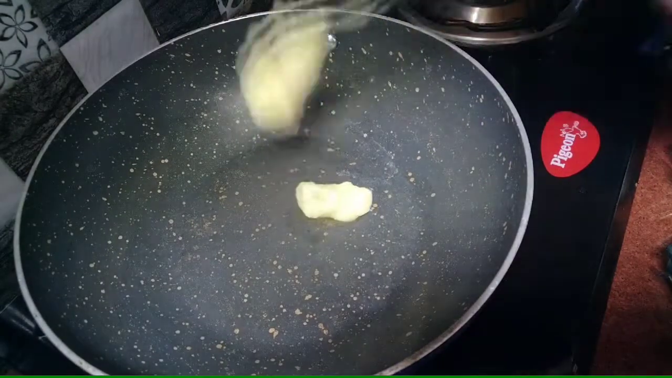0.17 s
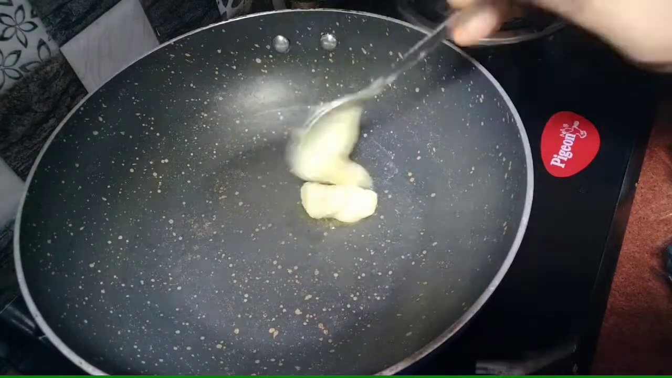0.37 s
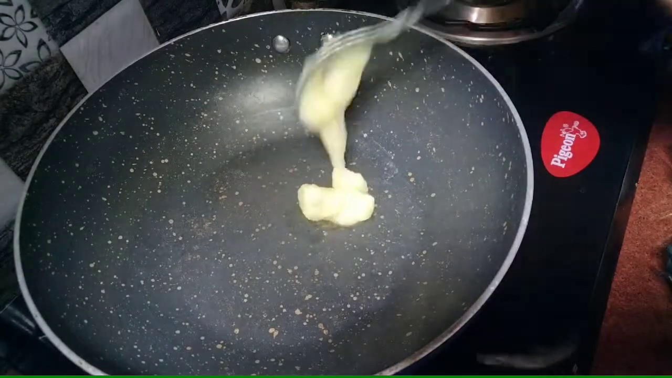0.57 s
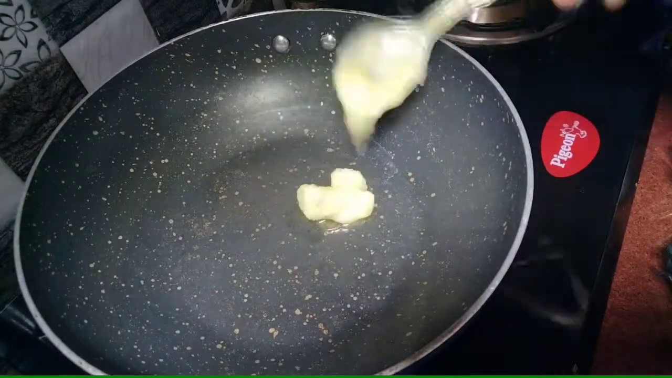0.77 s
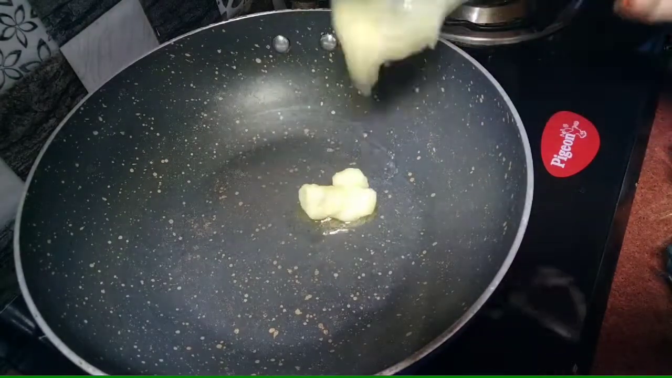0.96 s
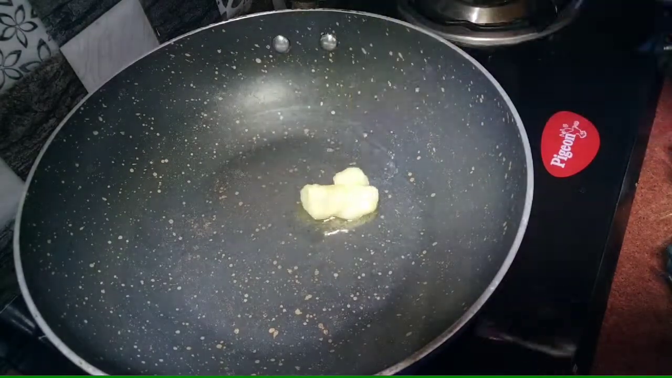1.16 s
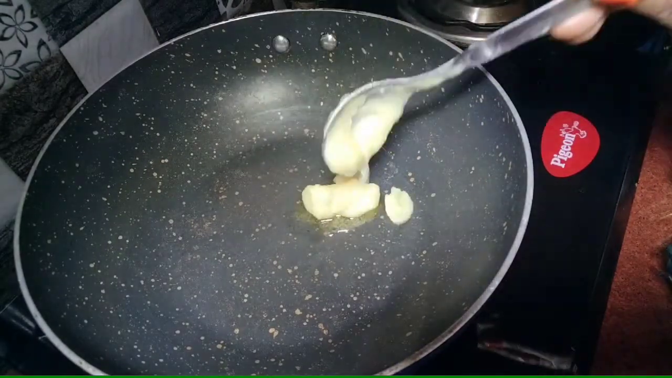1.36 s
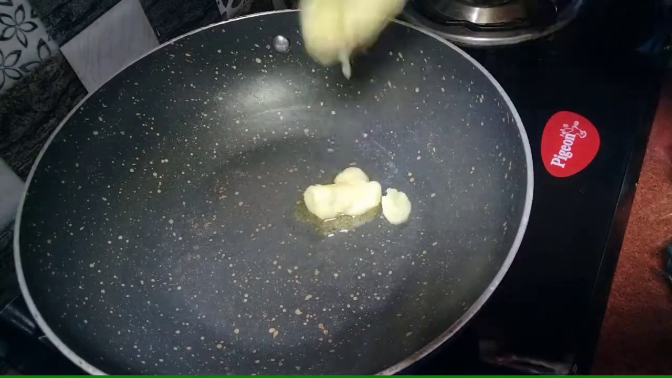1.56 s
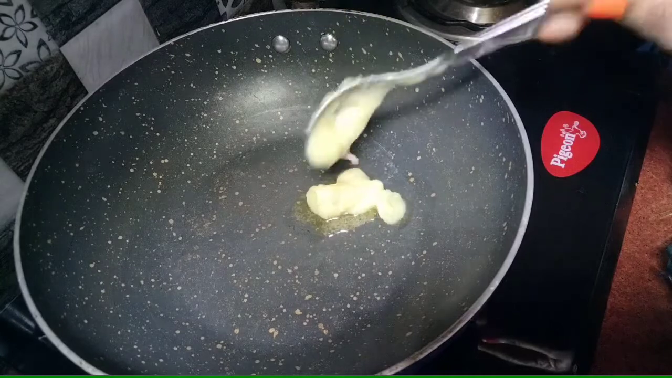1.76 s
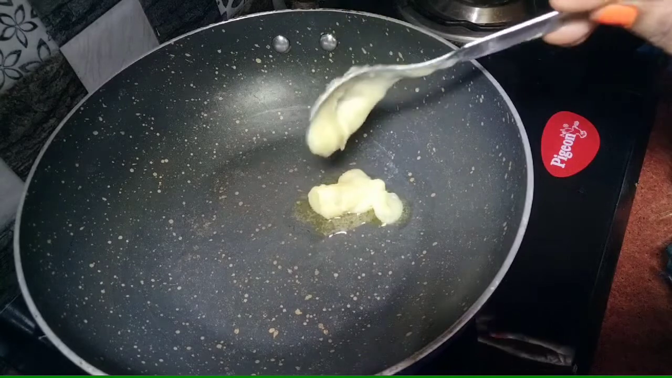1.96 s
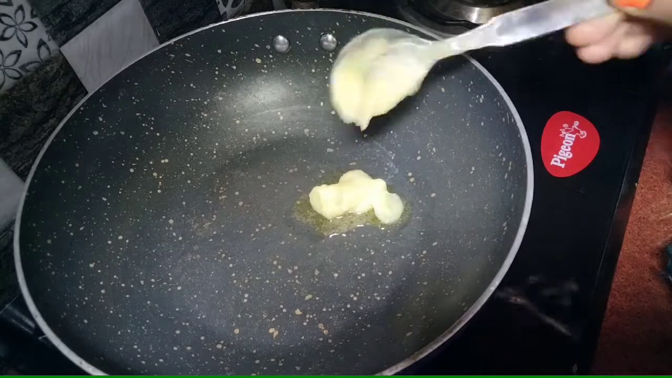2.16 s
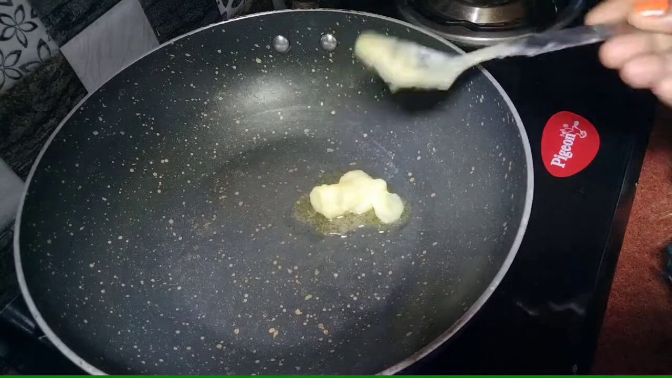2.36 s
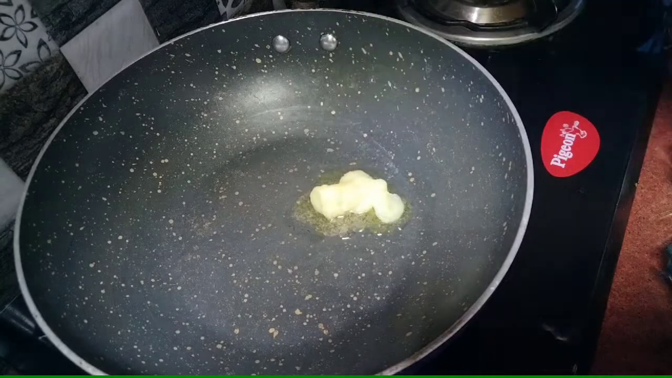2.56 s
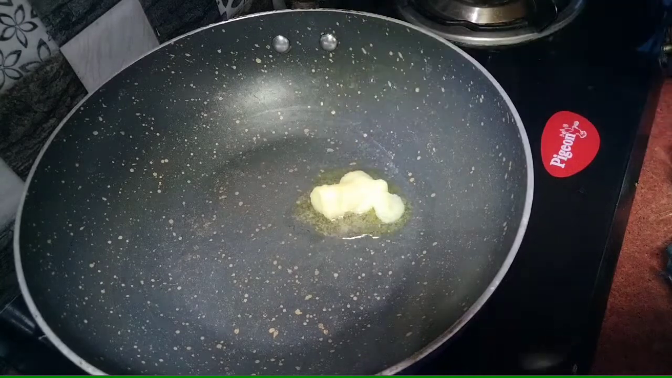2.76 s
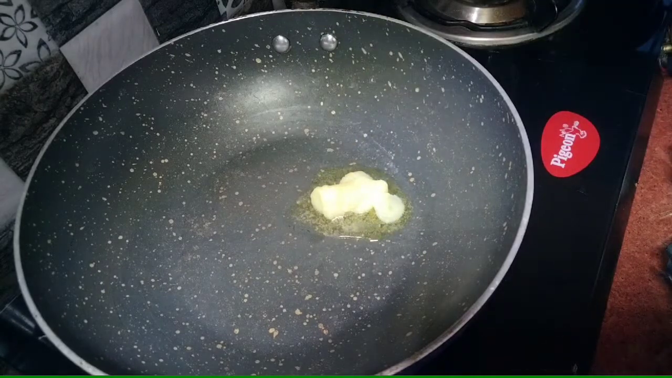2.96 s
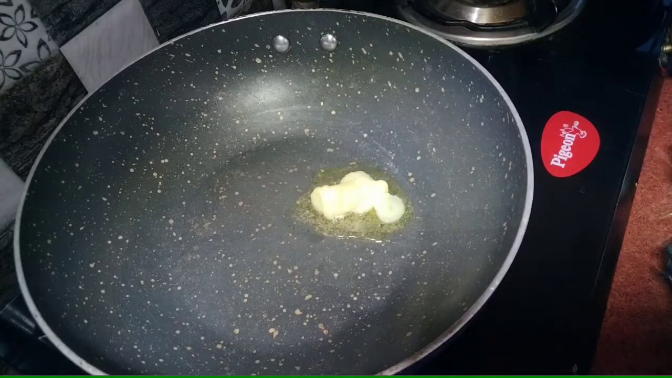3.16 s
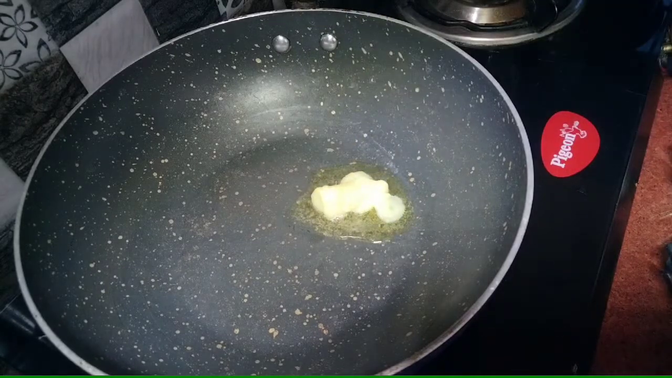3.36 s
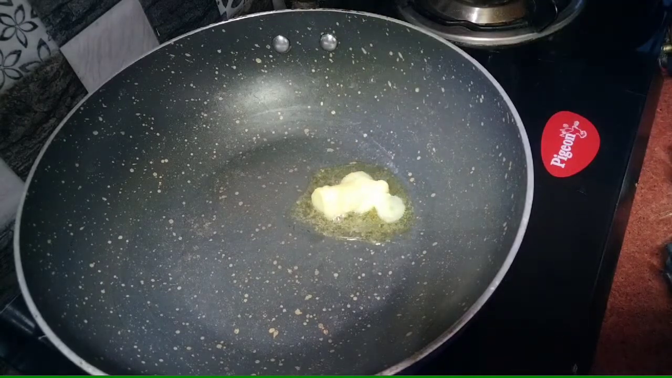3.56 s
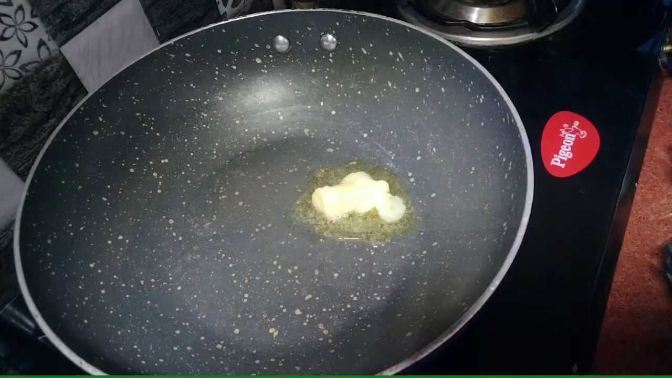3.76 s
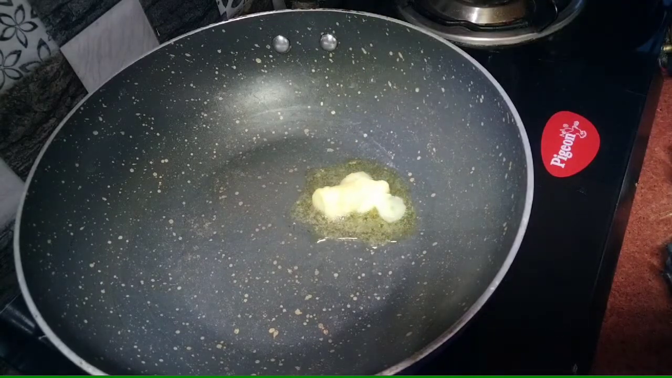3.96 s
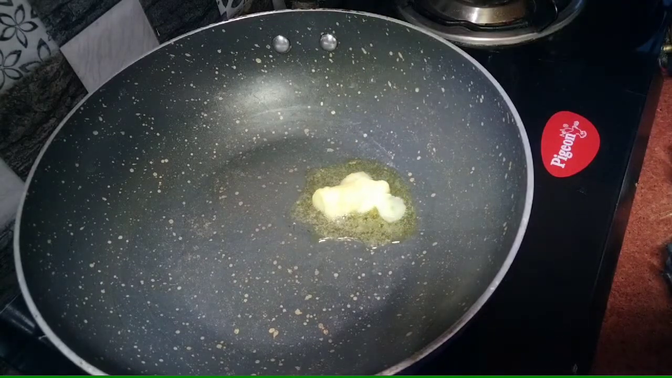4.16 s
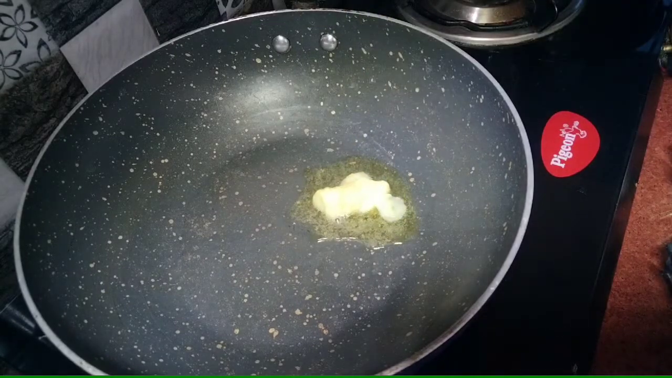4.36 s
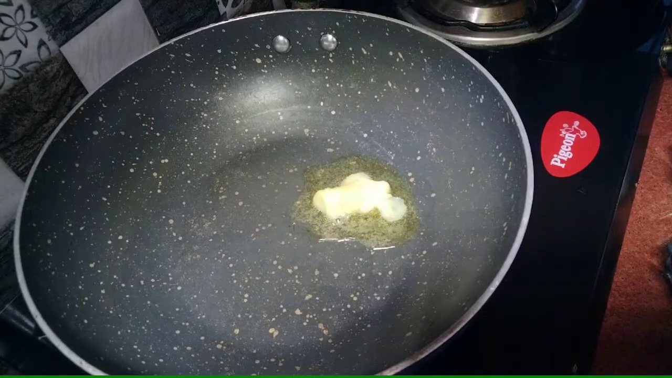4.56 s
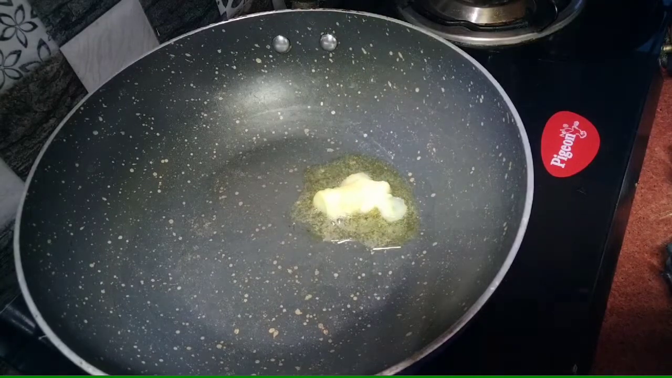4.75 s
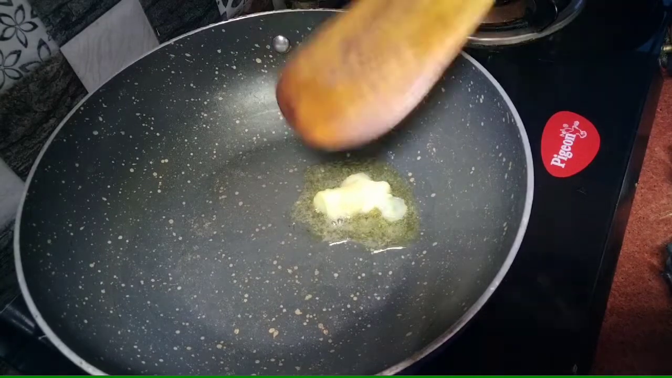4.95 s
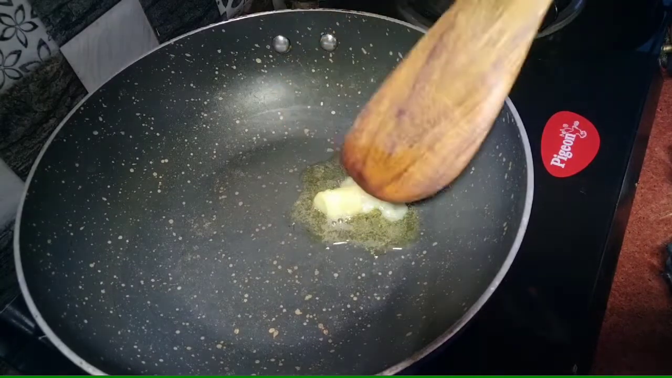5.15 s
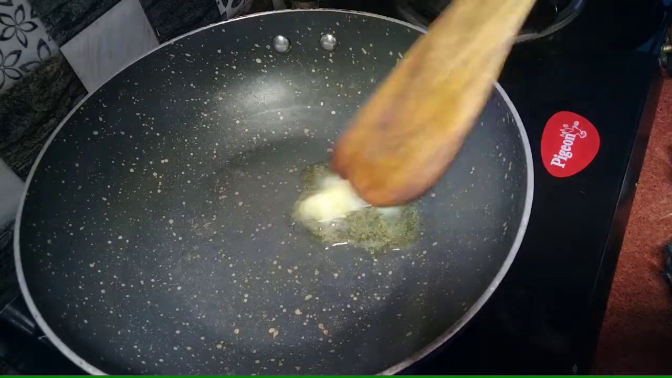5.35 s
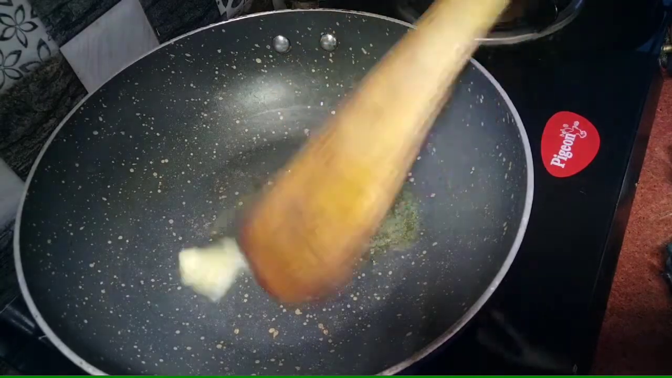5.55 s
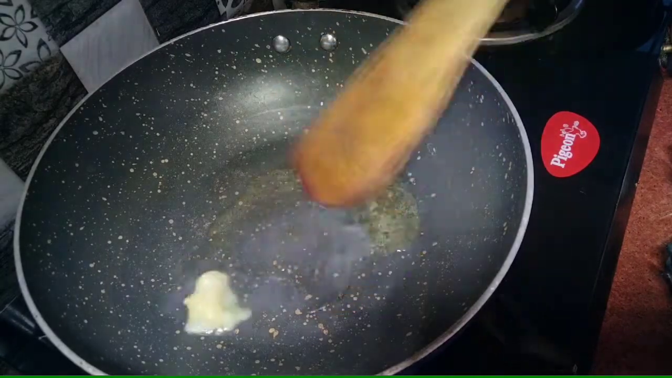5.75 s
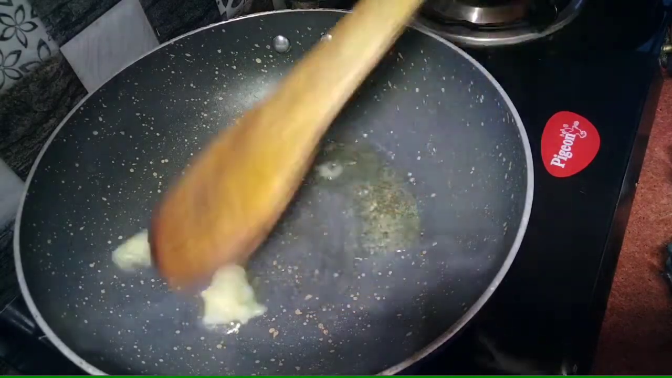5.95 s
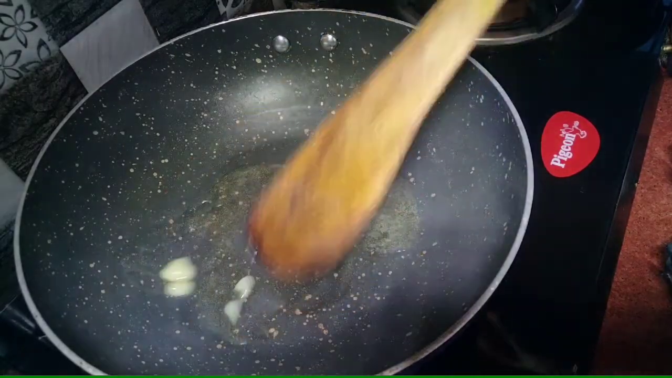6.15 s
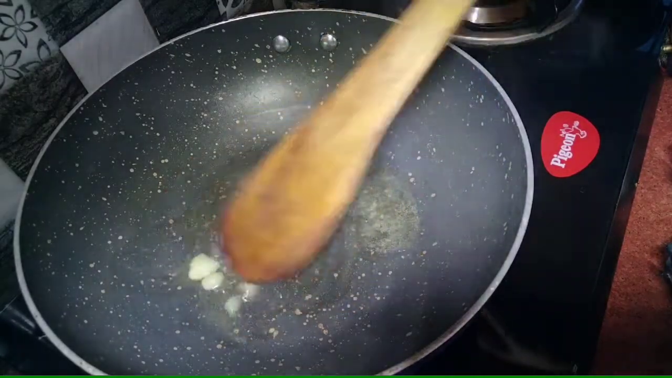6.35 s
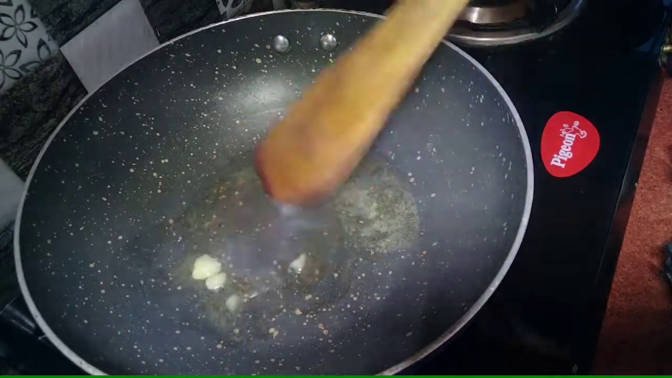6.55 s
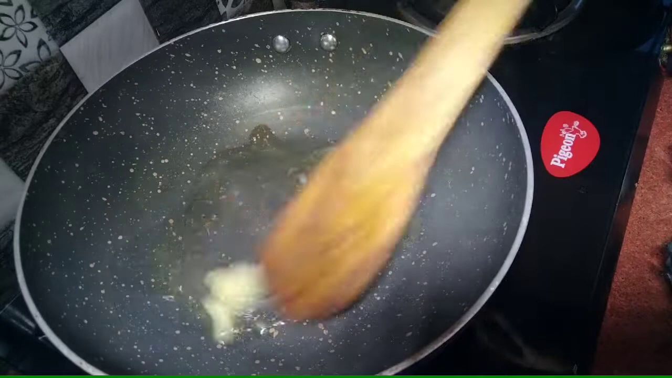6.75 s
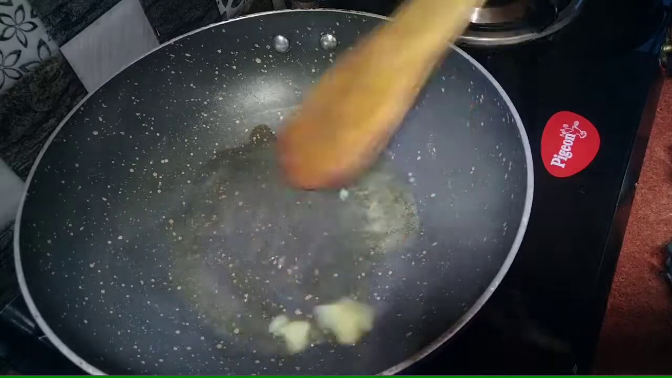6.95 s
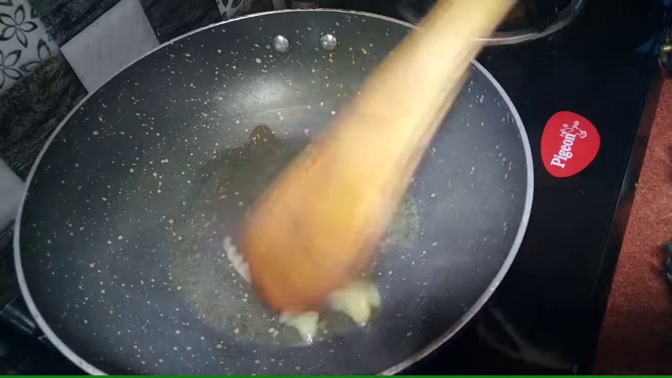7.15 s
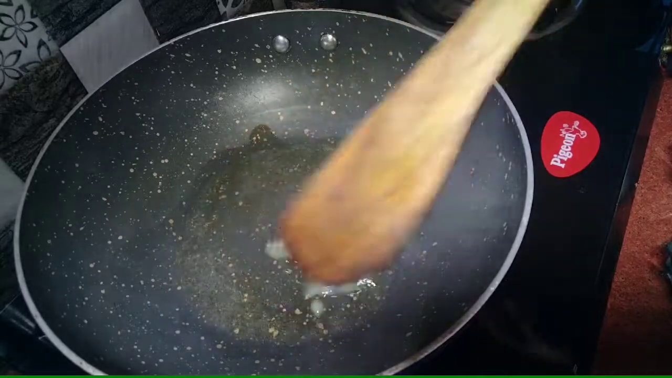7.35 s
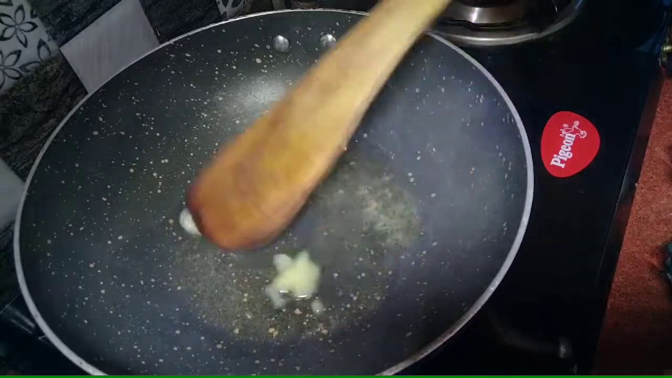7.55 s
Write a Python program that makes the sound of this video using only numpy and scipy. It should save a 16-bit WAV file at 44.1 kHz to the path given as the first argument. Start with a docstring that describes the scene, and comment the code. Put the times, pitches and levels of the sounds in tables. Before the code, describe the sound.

Melting fat ticks and pops quietly with small metallic clinks, until a wooden spatula smears it and the crackle surges into dense frying sizzle.

```python
"""Ghee melting in a hot pan

Water boils out of a lump of ghee in small bursting bubbles, made of short cracks and ringing cavities.
Lone louder spits stand out, and a spoon clinks and rubs off to the side as a set of ringing metal tones.
Then a wooden spatula clicks down and, in tiny random slips, smears the fat: the crackle swells to a sizzle.
Behind it lie the filtered-noise rumble of a small kitchen, a low hum and faint far tones."""
import sys
import numpy as np
from scipy import signal
from scipy.fft import rfft, irfft
from scipy.io import wavfile
from scipy.ndimage import uniform_filter1d

SR = 44100
rng = np.random.default_rng(int(sys.argv[2]) if len(sys.argv) > 2 else 0)


def unload_audio(sound):
    """Save the sound as a 16-bit wav file, at the path given as the first command line argument."""
    columns = np.transpose(np.atleast_2d(sound))
    # keep every value between -1 and 1, then stretch to whole-number steps
    steps = np.round(np.clip(columns, -1, 1) * 32767)
    wavfile.write(sys.argv[1], SR, steps.astype(np.int16))


N = 335157
T = np.arange(N) / SR  # time of each sample, in seconds
TOP_HZ = 15800  # upper limit of the sound

# tone balance of the melting fat: pitch_hz, level_db (relative)
MELT_COLOUR = [(200, -44), (700, -18), (1300, -18), (2400, -16.8), (4000, -11), (5200, -9), (6500, -10),
               (8100, -4.5), (8950, 0), (9500, -4.5), (10100, -5), (10900, -13), (13000, -13.5),
               (16000, -18.5)]
# moments when water seeps out and boils harder: start_s, length_s (until it fades), level_db
SURGES = [(-.02, 0.047, -47), (.73, 0.029, -50), (1.07, .18, -49), (1.48, 0.037, -47.5), (2.3, .12, -54),
          (3.26, 0.13, -48), (3.76, .04, -45), (3.88, 0.061, -49), (4.2, 0.21, -48), (4.8, 0.12, -49),
          (5.06, 0.42, -45.5)]
# the crackle grows as the pool of fat spreads: first and full level, time constant
MELT_FIRST_DB, MELT_FULL_DB, POOL_S = -52.5, -48, 0.89
# small bubbles that flare after each spit or tick: level against its listed level, decay time
FLURRY_DB, FLURRY_S = -23.5, 0.039


def melting():
    """Sparse crackle over a fine fizz: it grows with the pool, surges, and flares after each spit or tick."""
    growth_db = MELT_FULL_DB + (MELT_FIRST_DB - MELT_FULL_DB) * np.exp(-T / POOL_S)
    pool = undb(growth_db + 0.8 * walk(30.05))
    surges = swells(SURGES, attack_s=0.007, release_s=0.039)
    flurry_rows = [(start_s, 0, level_db + FLURRY_DB) for start_s, level_db, *_ in SPITS_AND_TICKS]
    flurries = swells(flurry_rows, attack_s=0.0022, release_s=FLURRY_S)
    flurries = flurries * (1 - covered())  # gone once the fat is smeared out
    crackle = boil(rate=700, spread_db=6.0, limit_db=13.0, tear_s=0.0012, ring_db=-6,
                   cycles=27.6, cavity_hz=7543, bunch_db=2.1)
    fizz = undb(-3.5) * rng.standard_normal(N)
    loudness = np.sqrt(pool ** 2 + surges ** 2 + flurries ** 2)
    return unit(colour(crackle + fizz, MELT_COLOUR)) * loudness


# single loud bubbles, and two ticks made the same way: at 3.410 s the bright tick of the spoon's clink,
# at 5.341 s the click of the spatula touching down. Columns: start_s,
# level_db (about the peak, before pan and kitchen), ring_hz (for a bubble, its cavity),
# ring_db (ring, relative), snap_db (low snap, relative)
SPITS_AND_TICKS = [(0.110, -30.5, 10460, 7, -23), (0.333, -30, 5510, -9, -21), (0.371, -28, 13400, -1, -36),
                   (0.426, -27, 7260, -1, -28), (0.499, -28, 8800, -5, -27), (0.758, -30.5, 12000, 6, -31),
                   (0.943, -28, 11020, 4, -25), (1.111, -32, 6750, 0, -28), (1.180, -27.5, 7410, -2, -25),
                   (1.326, -28, 9070, -1, -23), (1.694, -28, 7580, 4, -29), (1.821, -29.5, 8720, -3, -22),
                   (1.834, -26, 6760, -3, -13), (1.900, -27, 8900, -3, -26), (2.166, -24.5, 8950, -7, -14),
                   (2.573, -24, 9100, -13, -11), (2.796, -26.5, 8940, 2, -22),
                   (3.347, -24.5, 8740, -6, -13), (3.410, -21.5, 9650, -5, -20),
                   (3.490, -30, 8860, -6, -22), (3.572, -24, 8660, -3, -18), (3.835, -23.5, 8250, -2, -29),
                   (3.970, -27.5, 9400, -1, -22), (4.069, -26.5, 7440, -2, -15),
                   (4.165, -22.5, 7030, -5, -17), (4.260, -29, 8800, -1, -23), (4.374, -26, 8530, -5, -32),
                   (4.563, -26.5, 8600, -4, -21), (4.648, -30.5, 7750, 3, -33), (4.795, -27, 7360, 4, -26),
                   (5.035, -26, 5030, 0, -19), (5.162, -33, 6840, 5, -25), (5.341, -20.5, 9000, -2, -15),
                   (6.306, -17, 10250, -4, -24), (6.528, -18.5, 8000, 0, -35),
                   (6.818, -14.5, 8440, -21, -29), (6.867, -9.8, 8380, -1, -33),
                   (7.015, -17.5, 8300, -1, -21)]


def spits_and_ticks():
    """Lone bubbles burst as dry snaps or ringing pips; the spoon's tick and spatula's click work alike."""
    out = np.zeros(N)
    for start_s, level_db, ring_hz, ring_db, snap_db in SPITS_AND_TICKS:
        burst = bubbles(np.array([ring_hz]), np.array([0.0012]), ring_db=ring_db, cycles=16, size=500)[0]
        pop = colour(burst, MELT_COLOUR)
        snap = resonate(burst, [(2470, 5400, 0)])  # a broad low resonance
        pop = pop / np.abs(pop).max()
        snap = undb(snap_db) * snap / np.abs(snap).max()
        add(out, start_s, undb(level_db) * (pop + snap) / (1 + undb(snap_db)))
    return out


# pushes of the spatula: start_s, length_s (until it fades), scrape_db, extra_sizzle_db
STROKES = [(5.186, .04, -53.5, -60), (5.546, 0.065, -52, -40), (5.853, .08, -58, -37.5),
           (5.93, .04, -47.5, -46), (6.08, .11, -55, -40), (6.31, .05, -55, -41), (6.458, 0.12, -50, -33.5),
           (6.816, 0.064, -49, -38), (6.96, .12, -59, -39), (7.208, .09, -57, -40),
           (7.39, 0.11, -50, -38.5)]
STROKE_ATTACK_S, STROKE_RELEASE_S = 0.025, 0.038
# tone balance of the smeared fat: pitch_hz, level_db (relative)
SMEAR_COLOUR = [(150, -26), (700, -21), (2000, -18), (3400, -17.5), (4300, -12.3), (6400, -13), (7700, -8),
                (8900, -1.5), (9900, -4.5), (11200, -11.5), (13000, -11.5), (16000, -14)]
# fat meets fresh metal: start, time to cover it, steady sizzle level once covered
SMEAR_S, SPREAD_S, SIZZLE_DB = 5.327, 0.23, -34
# the finest spray thins as water boils off: level at SMEAR_S before the covered share, fall
SPRAY_DB, SPRAY_FADE_DB_PER_S = -44.5, 6


def smeared():
    """A thin film boils all over: dense bubbles flare at each push, under a fine spray that thins out."""
    flare_rows = [(start_s, length_s, sizzle_db) for start_s, length_s, _, sizzle_db in STROKES]
    flares = swells(flare_rows, STROKE_ATTACK_S, STROKE_RELEASE_S)
    sizzle_loudness = np.hypot(undb(SIZZLE_DB + 0.5 * walk(16)), flares)
    spray_loudness = undb(SPRAY_DB - SPRAY_FADE_DB_PER_S * np.maximum(T - SMEAR_S, 0))
    crackle = boil(rate=3200, spread_db=3.5, limit_db=8.5, tear_s=0.00052, ring_db=-10,
                   cycles=22.5, cavity_hz=8380, bunch_db=0.42)
    sizzle = unit(colour(crackle, SMEAR_COLOUR))
    spray = unit(colour(rng.standard_normal(N), [(8000, -26), (10000, -14), (11500, 0), (16000, -3)]))
    return covered() ** 1.4 * (sizzle_loudness * sizzle + spray_loudness * spray)


def covered():
    """Share of the hot metal that the spatula has coated with fat, growing steadily from 0 to 1."""
    return np.clip((T - SMEAR_S) / SPREAD_S, 0, 1)


# tone balance of the scraping wood: pitch_hz, level_db (relative)
SCRAPE_COLOUR = [(60, -1.5), (150, -2.5), (400, -2), (650, -3.5), (950, -2), (1800, -6.5), (3000, -5.5),
                 (5000, -13)]
# knocks and short squeaks, one row per tone: start_s, level_db (before a 5.5 dB cut),
# pitch_hz, length_s (loudest halfway)
RUBS = [(5.195, -46.5, 364, 0.032), (5.2, -51.5, 530, 0.026), (5.302, -43, 315, 0.0094),
        (5.322, -42, 126, 0.018), (5.391, -40.5, 890, 0.018), (5.85, -34.5, 2890, 0.0078),
        (5.952, -42, 974, 0.012), (5.953, -42, 1750, 0.007), (7.252, -37, 1330, 0.0094),
        (7.253, -33, 5280, 0.009), (7.254, -19, 9170, .012)]
DRAG_DB = -55  # light rubbing between pushes, once the metal is covered


def spatula():
    """Wood slides on the greasy coating in tiny slips, harder at each push; at times it knocks or squeaks."""
    push_rows = [(start_s, length_s, scrape_db) for start_s, length_s, scrape_db, _ in STROKES]
    pushes = swells(push_rows, STROKE_ATTACK_S, STROKE_RELEASE_S)
    slip_now = rng.random(N) < 2500 / SR  # about 2500 slips per second
    slips = rng.standard_normal(N) * slip_now * undb(2.0 * walk(60))
    out = unit(colour(slips, SCRAPE_COLOUR)) * np.hypot(undb(DRAG_DB) * covered(), pushes)
    t = np.arange(SR // 4) / SR
    for start_s, level_db, pitch_hz, length_s in RUBS:
        age = t / (length_s / 2)
        envelope = age * np.exp(1 - age)
        # the grip is uneven, so the pitch scatters
        turns = np.cumsum(pitch_hz + 45 * walk(900)[:len(t)]) / SR
        add(out, start_s, undb(level_db - 5.5) * envelope * np.sin(2 * np.pi * turns))
    return out


# light clinks of the spoon, perhaps on the ghee jar: start_s, level_db (peak, before the kitchen),
# centre_hz (tones near this ring most), ring_s (time to fall by 60 dB)
CLINKS = [(0.19, -50, 3450, .3), (0.555, -49, 2920, 0.27), (0.885, -54, 2900, 0.25),
          (1.17, -46, 2880, 0.19), (1.827, -37, 5200, .05), (1.828, -35.5, 3000, 0.14),
          (3.412, -36, 1900, 0.33), (3.412, -33, 4200, 0.22), (3.769, -37, 3400, 0.26),
          (4.047, -37, 3050, 0.17)]
# tones the spoon can ring with: pitch_hz, level_db (relative)
SPOON_TONES = [(1620, -4), (1740, -6), (2080, 0), (2420, -7), (2835, -5), (3070, -9), (3400, -4.5),
               (3990, -7.5), (4260, -15), (4940, -14), (6240, -1)]


def spoon():
    """Light clinks: tones round the centre of the blow ring cleanly and buzz while the metal chatters."""
    out, t = np.zeros(N), np.arange(SR // 2) / SR
    hz, tone_db = np.transpose(SPOON_TONES)
    for start_s, level_db, centre_hz, ring_s in CLINKS:
        weight = undb(tone_db) * np.exp(-(np.log(hz / centre_hz) / 0.2) ** 2)
        ring = weight @ np.sin(2 * np.pi * (hz[:, None] * t + rng.random((len(hz), 1))))
        # each buzz is noise passed twice through a resonance 400 Hz wide
        buzzes = []
        for f in hz:
            once = resonate(rng.standard_normal(len(t)), [(f, 400, 0)])
            buzzes.append(unit(resonate(once, [(f, 400, 0)])))
        buzz = weight @ buzzes
        ringing = (ring + undb(-4) * buzz) * 1000 ** (-t / ring_s)
        chatter = undb(14.5) * buzz * np.exp(-t / 0.0022)
        clink = ringing + chatter
        add(out, start_s, undb(level_db) * clink / np.abs(clink).max())
    return out


# tones of a thin metallic ring: pitch_hz, level_db (relative)
RING_TONES = [(2848, -77), (3375, -79), (4247, -75), (4603, -74), (5830, -74), (6368, -73), (6675, -69)]
# the ring, already begun at the opening: start, time until it fades, level, width of its tones
RING_S, RING_LENGTH_S, RING_DB, RING_WIDTH_HZ = -0.02, 1.25, -63.5, 35


def rubbed_metal():
    """Uneven rubbing, perhaps of a utensil off to the side, keeps a few thin metal tones ringing."""
    tones = [(pitch_hz, RING_WIDTH_HZ, level_db) for pitch_hz, level_db in RING_TONES]
    rub = rng.standard_normal(N) * undb(2 * walk(19.8))
    envelope = swell(RING_S, RING_LENGTH_S, attack_s=0.02, release_s=0.08)
    return undb(RING_DB) * unit(resonate(rub, tones)) * envelope


# tone balance of the room rumble: pitch_hz, level_db (relative)
ROOM_COLOUR = [(20, -2), (55, -7.5), (85, -0.5), (120, -0.5), (148, 2), (190, -5.5), (300, -6.5), (500, -9),
               (700, -16.5), (1500, -16.5), (5000, -17), (16000, -46)]


def background():
    """Filtered noise makes the room rumble; a low hum and faint far tones join it."""
    rumble = undb(-63.2) * unit(colour(rng.standard_normal(N), ROOM_COLOUR)) * undb(1.0 * walk(4.8))
    return rumble + hum() + glide() + drone()


# the low hum: pitch, level, greatest swing of its wavering
HUM_HZ, HUM_DB, HUM_WAVER_DB = 96.4, -67, 6.0


def hum():
    """One low tone whose pitch and level waver at random."""
    turns = np.cumsum(HUM_HZ + 2.33 * walk(14)) / SR
    waver = undb(HUM_WAVER_DB * np.tanh(walk(12)))
    return undb(HUM_DB) * unit(np.sin(2 * np.pi * turns) * waver)


# the gliding tone: top and final pitch, time of the top, time scale of the fall
GLIDE_TOP_HZ, GLIDE_END_HZ, GLIDE_TOP_S, GLIDE_FALL_S = 520, 330, 0.06, 0.17
GLIDE_DB, GLIDE_HOLD_S = -64.5, 0.26  # level before echoes and time until it fades


def glide():
    """A faint far tone arches over and sinks, with a shaky pitch and echoes."""
    arch = np.exp(-((T - GLIDE_TOP_S) / GLIDE_FALL_S) ** 2)
    pitch_hz = GLIDE_END_HZ + (GLIDE_TOP_HZ - GLIDE_END_HZ) * arch
    turns = np.cumsum(pitch_hz * (1 + 0.0603 * walk(249.7))) / SR
    tone = unit(np.sin(2 * np.pi * turns) * undb(3.6 * walk(60)))
    envelope = swell(0, GLIDE_HOLD_S, attack_s=0.087, release_s=0.12)
    return kitchen(undb(GLIDE_DB) * envelope * tone, t60=0.4, wet_db=-1)


# notes of the drone: pitch_hz, width_hz, level_db (relative); width and level are for one of two passes
FAR_NOTES = [(338.2, 20, 1.5), (395.8, 17, 1.5), (422.7, 22, -1.6)]
# times the drone swells: start_s, length_s (until it fades), level_db
DRONE_SWELLS = [(2.2, 0.51, -67.5), (4.13, .42, -65)]
DRONE_DB = -74  # resting level


def drone():
    """Noise passed twice through narrow resonances makes a faint far chord that swells."""
    notes = unit(resonate(resonate(rng.standard_normal(N), FAR_NOTES), FAR_NOTES))
    return np.hypot(undb(DRONE_DB), swells(DRONE_SWELLS, attack_s=0.066, release_s=0.1)) * notes


def bubbles(hz, tear_s, ring_db, cycles, size=300):
    """One row per bubble: the film tears with a brief crack and the open cavity rings for a few cycles."""
    t = np.arange(size) / SR
    crack = rng.standard_normal((len(hz), size)) * np.exp(-(t / tear_s[:, None]) ** 2)
    turns = hz[:, None] * t
    ring = np.sin(2 * np.pi * turns) * np.exp(-turns / cycles)
    return crack + undb(ring_db) * ring


def boil(rate, spread_db, limit_db, tear_s, ring_db, cycles, cavity_hz, bunch_db):
    """A stream of bubbles (rate per second), many small and few large, that come in bunches; rms 1."""
    count = int(rate * T[-1])
    start = rng.integers(0, N, count)
    size_db = np.minimum(spread_db * rng.exponential(size=count), limit_db)
    size_db = size_db + bunch_db * walk(60)[start]
    pitch_chance, tear_chance = rng.standard_normal((count, 2)).T
    hz = np.clip(cavity_hz * np.exp(0.2386 * pitch_chance), 1000, TOP_HZ)
    grains = bubbles(hz, tear_s * np.exp(0.71 * tear_chance), ring_db, cycles)
    grains = grains * undb(size_db)[:, None]
    # add every bubble's samples at their places in time
    places = start[:, None] + np.arange(grains.shape[1])
    return unit(np.bincount(places.ravel(), grains.ravel())[:N])


def kitchen(x, t60, wet_db, count=8):
    """Hard nearby walls add a short diffuse tail; sound comes from changing spots with their own echoes."""
    t = np.arange(SR // 3) / SR
    fade = np.exp(-np.log(1000) * t / t60) * np.clip(t / 0.0011, 0, 1)
    wet = np.zeros(N)
    for _ in range(count):
        tail = rng.standard_normal(len(t)) * fade
        wet += signal.oaconvolve(x * walk(40), tail / np.linalg.norm(tail))[:N]
    return x + undb(wet_db) * wet / np.sqrt(count)


def swell(s, length_s, attack_s, release_s):
    """Loudness curve that starts rising at s, starts fading length_s later and dies away."""
    rise = np.clip((T - s) / attack_s, 0, 1)
    return rise * np.exp(-np.maximum(T - s - length_s, 0) / release_s)


def swells(rows, attack_s, release_s):
    """Joint loudness curve of (start_s, length_s, level_db) rows; their powers add."""
    powers = [(undb(db) * swell(s, length_s, attack_s, release_s)) ** 2 for s, length_s, db in rows]
    return np.sqrt(sum(powers))


def walk(rate):
    """Smooth random drift with rms 1, taking about `rate` new random steps per second."""
    k = max(int(SR / rate), 2)
    steps = np.repeat(rng.standard_normal(N // k + 1), k)
    return unit(uniform_filter1d(uniform_filter1d(steps, k), k)[:N])


def colour(x, points):
    """Causal filter with a spectrum of (pitch_hz, level_db) points, so that clicks stay sharp."""
    size = 4096
    hz, db = np.transpose(points)
    f = np.maximum(np.fft.rfftfreq(size, 1 / SR), 1)
    # folding the cepstrum puts the filter's energy as early as possible (minimum phase)
    cepstrum = irfft(np.log(undb(np.interp(np.log(f), np.log(hz), db))))
    cepstrum[1:size // 2] *= 2
    cepstrum[size // 2 + 1:] = 0
    return signal.fftconvolve(x, irfft(np.exp(rfft(cepstrum))))[:len(x)]


def resonate(x, modes):
    """Sum of resonances, each (pitch_hz, width_hz, level_db)."""
    return sum(undb(db) * signal.lfilter(*signal.iirpeak(hz, hz / width, fs=SR), x) for hz, width, db in modes)


def undb(db):
    """Decibels to gain."""
    return 10 ** (np.asarray(db) / 20)


def unit(x):
    """Scale to rms 1."""
    return x / np.sqrt(np.mean(x ** 2))


def add(out, s, sound):
    """Mix a sound in at a time in seconds."""
    i = max(int(s * SR), 0)
    out[i:i + len(sound)] += sound[:max(N - i, 0)]


# ringing tones of the pan: pitch_hz, width_hz, level_db (relative)
PAN_TONES = [(922, 73, 4), (1770, 59, -1), (2800, 140, -6), (3400, 50, -5), (5800, 100, -18),
             (7020, 89, -1.5), (7200, 52, -7)]


def scene():
    """The melting, spits, ticks and stirring also ring the pan; both channels carry the same sound."""
    lump = melting() + spits_and_ticks()
    stirring = smeared() + spatula()
    lump_ring = undb(-4) * resonate(lump, PAN_TONES)
    stirring_ring = undb(-13) * resonate(stirring, PAN_TONES)
    pan = lump + lump_ring + stirring + stirring_ring
    mono = kitchen(pan + spoon() + rubbed_metal(), t60=0.45, wet_db=-4.5) + background()
    return np.array([mono, mono])


def record(dry):
    """A steep low-pass filter cuts the sound above TOP_HZ."""
    return signal.sosfilt(signal.ellip(12, 0.1, 80, TOP_HZ, fs=SR, output="sos"), dry)


dry = scene()
out = record(dry)
unload_audio(out)
```